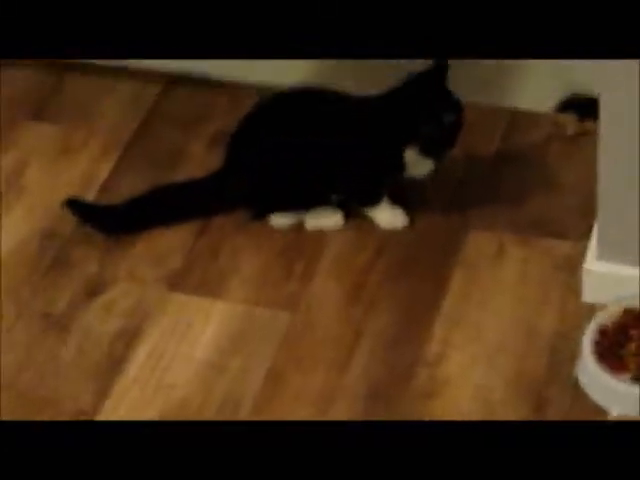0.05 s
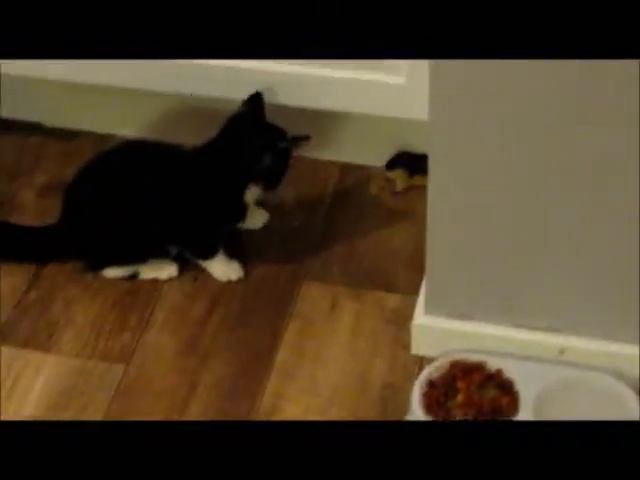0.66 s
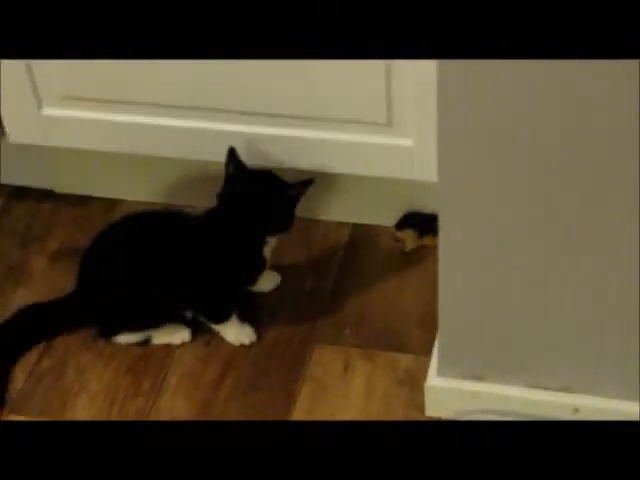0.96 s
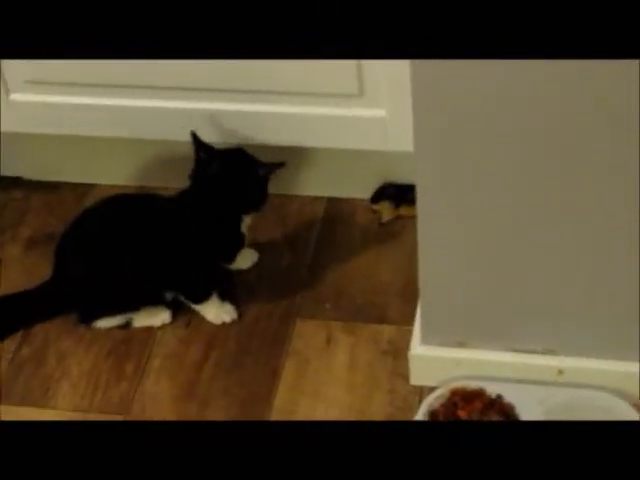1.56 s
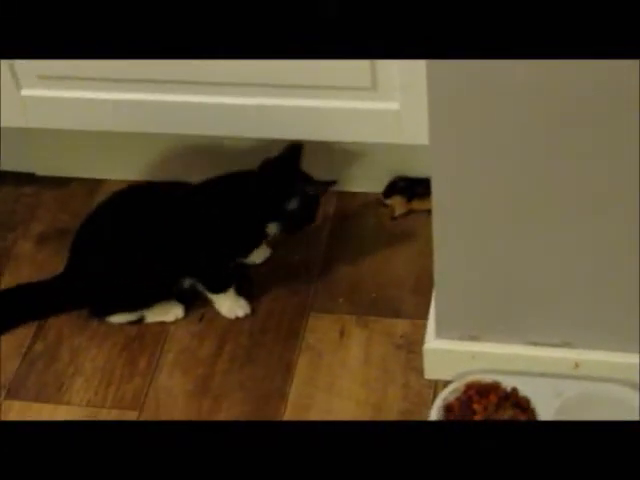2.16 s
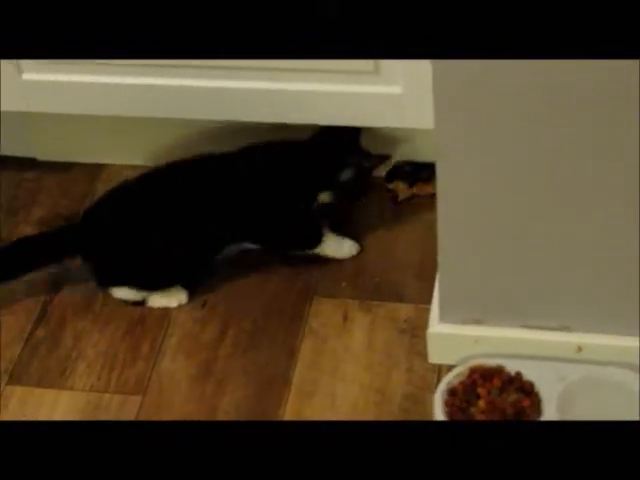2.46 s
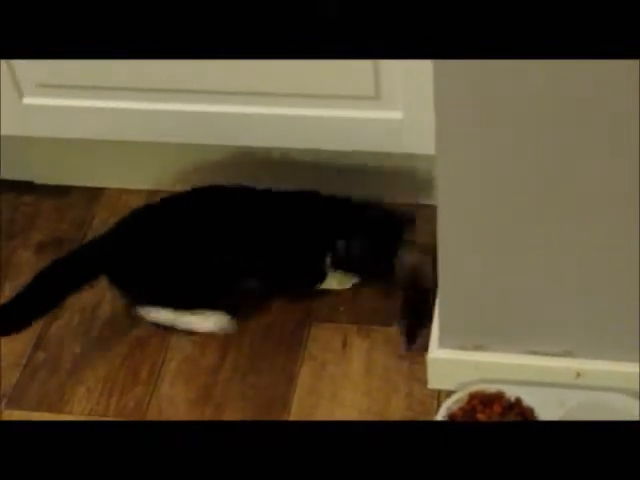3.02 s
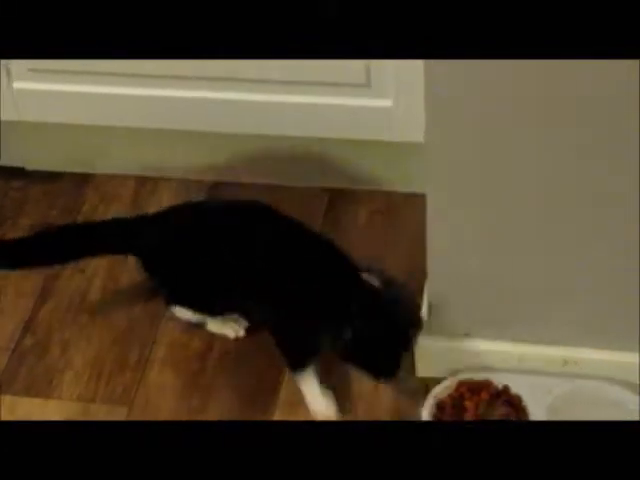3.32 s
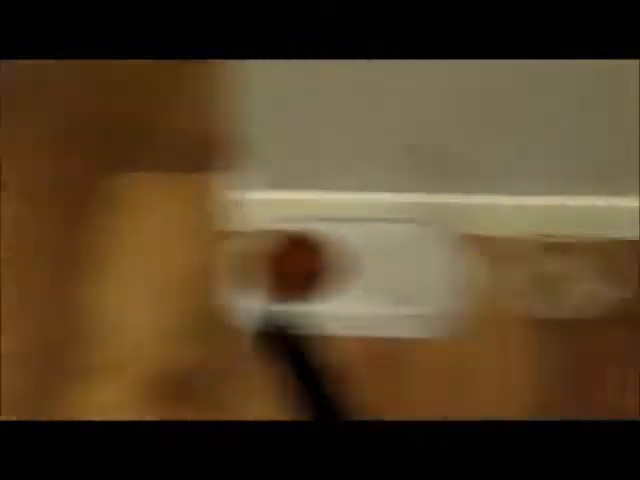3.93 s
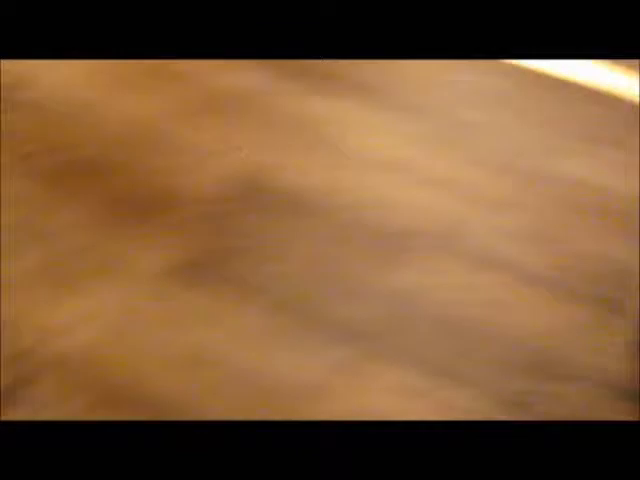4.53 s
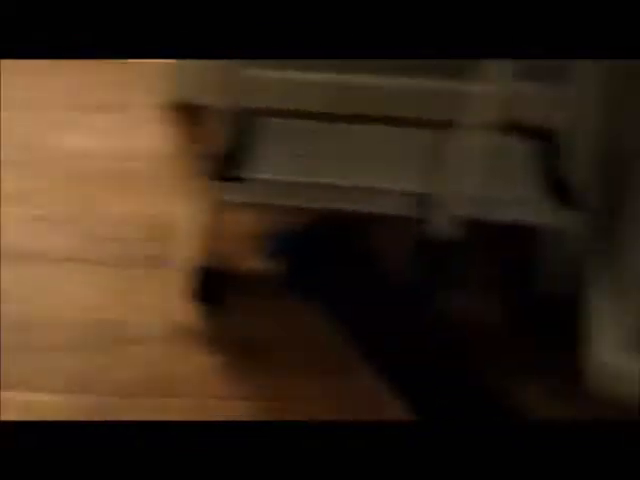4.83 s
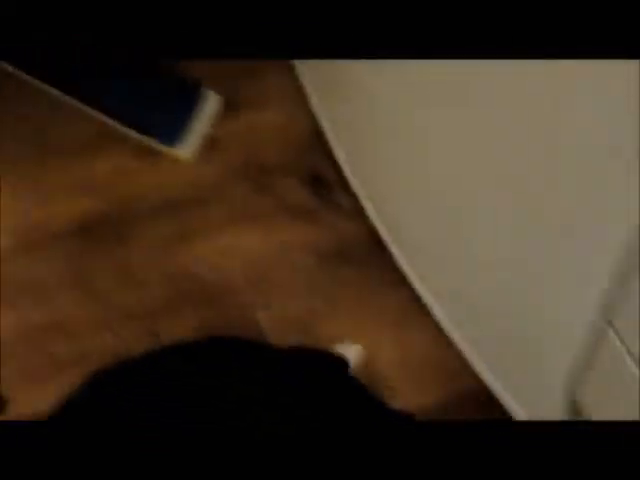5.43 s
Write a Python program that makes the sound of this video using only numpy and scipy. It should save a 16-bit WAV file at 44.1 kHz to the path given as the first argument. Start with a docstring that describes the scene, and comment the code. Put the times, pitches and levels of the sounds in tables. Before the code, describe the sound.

A mouse squeals in shrill bursts as a kitten pounces and chases it, paws thudding, skidding and scratching on a wooden kitchen floor.

```python
"""A kitchen hums quietly while a hand-held recorder ticks and rubs in the grip.
At 2.5 s a cornered mouse squeals in shrill, arched calls, and a kitten pounces on the wooden floor.
Paws thud, skid and scratch across the boards, and clothes rustle as the recorder follows the chase.
At 4.7 s the mouse squeals again. The animals ring in the room, and the recorder turns itself
down under both bouts of squeals."""
import sys
import numpy as np
from scipy import signal
from scipy.fft import rfft, irfft
from scipy.io import wavfile
from scipy.ndimage import uniform_filter1d

SR = 44100
rng = np.random.default_rng(int(sys.argv[2]) if len(sys.argv) > 2 else 0)


def inscribe(sig):
    """Save sig as 16-bit PCM at rate SR to the path in sys.argv[1].

    A 1-D sig is mono; a 2-D sig holds one channel per row.
    Samples are clipped to [-1, 1] before scaling.
    """
    pcm = np.round(np.clip(np.atleast_2d(sig).T, -1, 1) * 32767)
    wavfile.write(sys.argv[1], SR, pcm.astype(np.int16))


N = 246078
T = np.arange(N) / SR
CUTOFF_HZ = 15900

# flurries of paws: (time [s], patter level [dB], hold [s], fur and claw scratch level [dB])
FLURRIES = [(2.605, -37.5, 0.13, -29), (2.898, -43.5, 0.075, -29), (3.025, -44.5, 0.058, -50),
            (3.24, -56, 0.11, -46), (4.103, -51, .1, -39.5), (4.303, -41, 0.048, -42),
            (4.394, -38, 0.12, -52), (4.538, -33.5, 0.17, -45), (4.754, -34, .09, -42),
            (4.98, -51, 0.14, -39), (5.552, -38, .03, -63)]
FLURRY_SWELL_S, FLURRY_T60 = 0.0094, 0.35   # a t60 is the seconds a sound takes to fade by 60 dB


def mouse(jitter=0.058, shimmer_db=6, turbulence=0.41, waver=0.009, fade_s=0.00104):
    """A tiny throat makes a whistle-like voice; rasp shakes its pitch and level and adds breath."""
    # one arch of pitch a row; two long squeals break and carry on lower in the next row,
    # and the two rows near 1100 Hz are low opening creaks:
    # (time [s], length [s], rise [s], top pitch [Hz], sag [semitones], level [dB], swell [dB],
    #  first harmonic [dB], harmonics above the second [dB], rasp [0-1])
    squeals = [ (2.520, .008, 0.00081, 1150, .1, -17, 21, 4.5, 1.5, 0.47),
               (2.524, .064, .019, 5305, 3, -4, -8, -1, 2, 0.16),
               (2.626, .020, .002, 4100, .1, -8.5, -5, -5, -7, .23),
               (2.659, 0.018, .008, 4850, 1.5, -13.5, 16, 3.5, 0, 0.28),
               (2.689, 0.027, 0.0055, 4940, 0.5, -15, -12, 5, 1, .32),
               (2.766, 0.0073, 0.0011, 1122, .1, -16, -8.5, -8, -9, 0.56),
               (2.7706, 0.065, .019, 5650, 4, -5, 0.5, 1, 1, 0.09),
               (2.829, 0.031, 0.0017, 3835, 1.5, -12, -11, 3, -2, 0.05),
               (2.925, 0.015, 0.0056, 4430, .3, -18.5, -7, 13, -6, 0.3),
               (2.972, 0.023, .005, 4110, .5, -8, 2, 0.5, 1, .14),
               (2.996, 0.032, .001, 4070, 0.5, -20, -2, 6, -7, 0.4),
               (3.025, 0.05, 0.0027, 4096, 0.95, -18, -4, 13, 1.5, 0.47),
               (3.092, .050, .002, 3400, .1, -33, -3, 24, 0, .12),
               (4.697, .049, .002, 4160, -.8, -5, 6.5, 1.5, 2.5, 0.17),
               (4.764, 0.0076, 0.0052, 4273, 0.5, -2.5, 6, -11, -12, 0.56),
               (4.768, .021, 0.0051, 5120, 0, -6.5, -11, -8, 2, 0.04),
               (4.794, 0.042, .011, 4700, 3, -13, -3, 3, -9, 0.1),
               (4.856, 0.075, .014, 4850, 1.14, -3.5, -3, -3.5, -6, .1),
               (4.970, 0.017, .006, 3750, .1, -13.5, -4, -6, 1, .24),
               (4.999, 0.021, 0.0076, 4180, 0.7, -13, -4, -1, 0, 0.1),
               (5.029, 0.018, 0.003, 3960, 0.5, -18.5, 0, 14.5, 9.5, 0.15),
               (5.083, 0.033, 0.0078, 5050, 0.54, -5, -5, 3, 4, 0.03),
               (5.116, .075, 0.00067, 4540, 1, -11.5, 10, 1, -0.5, 0.13), ]
    # what the throat and mouth let through: (frequency [Hz], level [dB])
    throat = [(1100, -18.5), (2200, -26), (3400, -22), (4300, -19), (4900, -13.5), (5400, 0), (6200, -3),
              (7300, 1), (8500, 0.5), (9600, 0.5), (10800, -8.5), (12500, -17.5), (14500, -26),
              (16000, -45)]
    out = np.zeros(N)
    shake = wander(600)
    throb = np.clip(wander(510), -1.5, 1.5)
    breath = turbulence * noise(throat)
    unsteady = 1 + waver * wander(118)   # even the clearest call wavers
    for s, length, rise_s, top_hz, sag, db, swell_db, first_db, upper_db, own_rasp in squeals:
        on = (T >= s) & (T <= s + length)
        t = T[on] - s
        octaves_down, closing = pitch_arch(t, length, rise_s, sag)
        rasp = own_rasp + .1 * closing   # the voice frays and weakens as the arch ends
        effort_db = db + swell_db * (t / length - .5) - 5 * closing
        hz = top_hz * 2 ** -octaves_down * unsteady[on] * (1 + jitter * rasp * shake[on])
        phase = 2 * np.pi * np.cumsum(hz) / SR
        voice = np.zeros(len(t))
        for k in range(1, 14):
            gain = gain_at(throat, k * hz) * from_db(first_db * (k == 1) + upper_db * (k > 2))
            voice += gain * (k * hz < CUTOFF_HZ) * np.sin(k * phase + 2 * np.pi * rng.random())
        fade = np.clip(np.minimum(t, length - t) / fade_s, 0, 1)
        loudness = fade * from_db(effort_db + shimmer_db * rasp * throb[on])
        out[on] += (np.sqrt(2) * voice + rasp * breath[on]) * loudness
    return out


def pitch_arch(t, length, rise_s, sag, rise_oct_per_s=17, drop_oct_per_s=13):
    """Pitch slides up, sags, then drops. Gives octaves below its top, and the drop's progress (0-1)."""
    rise_s = np.clip(rise_s, 1e-4, .9 * length)
    drop_s = min(.025, .36 * length)
    opening = np.clip(1 - t / rise_s, 0, 1) ** 1.2
    sagging = np.clip((t - rise_s) / (length - rise_s), 0, 1) ** 0.85
    closing = np.clip(1 - (length - t) / drop_s, 0, 1) ** 2.3
    octaves = rise_oct_per_s * rise_s * opening + sag / 12 * sagging + drop_oct_per_s * drop_s * closing
    return octaves, closing


def patter():
    """Flurries of soft paws drum on the boards."""
    # tone of the drummed boards: (frequency [Hz], level [dB])
    tone = [(60, -35), (170, 8), (330, -9), (560, 6), (850, -9.5), (1200, -0.5), (2000, -3.5), (4000, -4.5),
            (12000, -60)]
    flurries = strokes([(s, db, hold) for s, db, hold, _ in FLURRIES], FLURRY_SWELL_S, FLURRY_T60)
    return flurries * grainy_noise(tone, grain_db=5.5, grain_hz=37)


def thuds(t60=0.057, contact_s=0.0012, spread=0.216):
    """A soft landing makes the boards ring at seven nearby pitches."""
    # paws and steps landing: (time [s], relative level [dB], middle pitch [Hz])
    landings = [(2.618, -31, 460), (2.661, -33, 171), (2.735, -31, 289), (2.915, -34.5, 608),
                (3.065, -36.5, 213), (3.154, -25.5, 176), (3.185, -38, 200), (3.64, -39.5, 163),
                (3.92, -39, 158), (3.994, -31.5, 138), (4.208, -33, 723), (4.32, -37.5, 207),
                (4.49, -32, 200), (4.546, -33, 987), (4.584, -31, 340), (4.635, -33, 250), (4.73, -28, 213),
                (4.808, -26.5, 1003), (4.913, -29.5, 220), (5.106, -34.5, 377.5)]
    out, t = np.zeros(N), T[:SR // 4]
    for s, db, hz in landings:
        pitches = hz * np.exp(spread * np.linspace(-1, 1, 7) + rng.normal(0, 0.032, size=7))
        cycles = pitches[:, None] * t + rng.random((7, 1))
        ring = unit_power(np.sin(2 * np.pi * cycles).sum(axis=0))
        add(out, s, ring * from_db(db + 3 - 60 * t / t60) * np.clip(t / contact_s, 0, 1))
    return out


def claws(t60=0.031, trot_span_s=(3.33, 3.95), step_s=0.049):
    """Hard claws click on wood: loud single hits, and a light, uneven trot as the kitten sets off."""
    # the loudest clicks: (time [s], relative level [dB])
    clicks = [(3.409, -24.5), (3.586, -24.5), (3.777, -26.5), (4.012, -25), (4.039, -25.5), (4.067, -21),
              (4.209, -10.5), (4.274, -23), (4.427, -20), (4.576, -16.5), (4.654, -11), (5.381, -18),
              (5.446, -15)]
    # tone of a click: (frequency [Hz], level [dB])
    tone = [(500, -10), (1400, -11), (2600, -5), (4500, -3), (7000, 2), (9400, 5), (12500, -8),
            (15500, -22)]
    out, t = np.zeros(N), T[:SR // 40]
    steps = zip(np.arange(*trot_span_s, step_s), rng.standard_normal(size=(16, 2)))
    trot = [(s + 0.004 * late, -34 + 4.5 * harder) for s, (late, harder) in steps]
    for s, db in clicks + trot:
        add(out, s, from_db(db - 8.5 - 60 * t / t60))
    return out * noise(tone)


def skids(sharpness=9):
    """Sliding feet scrape the boards; they stick and slip, which sings around one pitch."""
    # feet sliding: (time [s], level [dB], hold [s], singing pitch [Hz])
    slides = [(2.886, -30, 0.047, 3700), (3.024, -31, 0.093, 3390), (3.254, -32.5, 0.02, 2530),
              (3.641, -47, 0.0065, 2380), (4.055, -44, 0.053, 2860), (4.116, -25.5, 0.023, 2920),
              (4.453, -36, 0.021, 2300), (4.634, -23, 0.0052, 3000), (5.24, -29.5, 0.0019, 2960)]
    # tone of the scrape: (frequency [Hz], level [dB])
    tone = [(300, -10.5), (1200, -5), (2100, 5), (2700, 4.5), (3600, 1.5), (4900, 4), (6200, -4), (8300, 9),
            (9600, 2.5), (11500, -18), (15500, -43)]
    out = np.zeros(N)
    scrape = grainy_noise(tone, grain_db=0.5, grain_hz=200)
    slips = rng.standard_normal(N)
    for *stroke, hz in slides:
        singing = unit_power(signal.lfilter(*signal.iirpeak(hz, sharpness, fs=SR), slips))
        out += strokes([stroke], swell_s=0.0078, t60=0.14) * (scrape + singing)
    return out


def rustling(pounce_s=2.6, still_db=-62):
    """Clothes rustle and brush once the chase is on; fur and claws scratch in each flurry."""
    # clothes moving with the chase: (time [s], relative level [dB])
    movement = [(3.2, -54.5), (3.85, -60), (4.06, -61.5), (4.29, -44), (4.58, -49.5), (4.84, -44),
                (4.96, -37), (5.27, -52.5), (5.58, -45)]
    # quick brushes of cloth: (time [s], level [dB], hold [s])
    swipes = [(4.206, -23.5, .009), (4.255, -30, 0.0071), (4.308, -32, .035), (4.46, -28.5, 0.0056),
              (4.485, -26, 0.0052), (4.602, -21.5, 0.014), (4.686, -27, 0.014), (4.805, -20.5, 0.024),
              (4.97, -31.5, 0.094), (5.445, -32.5, 0.025), (5.48, -35, 0.06)]
    # tone of cloth and fur: (frequency [Hz], level [dB])
    tone = [(100, -10.5), (500, -2.5), (1400, -10), (2600, -2), (4500, 2), (7000, 0.5), (9400, 4),
            (10800, -3), (12500, -16), (15500, -27.5)]
    clothes = np.where(T < pounce_s, from_db(still_db), from_db(7.5) * gain_over_time(movement))
    brushes = strokes(swipes, swell_s=0.0026, t60=0.14)
    fur = strokes([(s, db, hold) for s, _, hold, db in FLURRIES], FLURRY_SWELL_S, FLURRY_T60)
    loudness = np.sqrt(clothes ** 2 + brushes ** 2 + fur ** 2)
    return loudness * grainy_noise(tone, grain_db=1.5, grain_hz=250)


def grip(ring_db=-8, ring_t60=0.014, crack_t60=0.012):
    """The recorder's light case ticks, each time with a ring of its own, and fingers slide over it."""
    # ticks in the hand: (time [s], peak [dB], brightness [dB per octave], own ring [Hz])
    ticks = [(.024, -24.5, 12, 8440), (.067, -29.5, -1, 5700), (.246, -32, -42, 1820),
             (.344, -18, -2, 2690), (0.819, -20.5, -11.5, 3900), (0.83, -28.5, -12, 2900),
             (1.112, -28, 2, 9100), (1.1203, -12, -4.5, 10030), (1.124, -18, -13, 5900),
             (1.343, -31.5, -17, 4040), (1.527, -29.5, -20, 3560), (1.729, -16.5, -6, 10170),
             (1.931, -25.5, 9, 4600), (2.122, -28.5, -14, 2240)]
    # pitches the case rings at: (frequency [Hz], level [dB], t60 [s])
    case = [(2150, -7.5, 0.006), (3870, -2, 0.017), (4480, 1, 0.0078), (5500, 7, 0.0029),
            (8960, 15, 0.0055), (9830, 18, 0.0022), (11900, -46, 0.0067), (14400, -15, .004)]
    # fingers sliding: (time [s], level [dB], hold [s])
    rubs = [(.458, -41.5, 0.064), (.68, -53.5, .015), (.759, -44, 0.054), (1.08, -52, 0.048)]
    # tone of a rub: (frequency [Hz], level [dB])
    rub_tone = [(900, -25), (1700, -6.5), (2300, -5), (2750, 0.5), (3600, -6), (5000, -10.5), (5650, -5.5),
                (6700, -22), (8200, -12), (9200, -9.5), (11000, -27), (15000, -42)]
    out, t = np.zeros(N), T[:SR // 40]
    shell = signal.butter(3, [900, 11000], "band", fs=SR, output="sos")
    for s, peak_db, brightness, ring_hz in ticks:
        body = np.zeros(len(t))
        for hz, db, t60 in case:
            fade = from_db(db + brightness * np.log2(hz / case[0][0]) - 60 * t / t60)
            body += fade * np.sin(2 * np.pi * hz * rng.normal(1, 0.018) * t) * rng.choice([-1, 1])
        ring = from_db(ring_db - 60 * t / ring_t60) * np.sin(2 * np.pi * ring_hz * t)
        crack = 0.35 * rng.standard_normal(len(t)) * from_db(-60 * t / crack_t60)
        tick = signal.sosfilt(shell, body / np.abs(body).max() + ring + crack)
        add(out, s, from_db(peak_db) * tick / np.abs(tick).max())
    rubbing = strokes(rubs, swell_s=0.0058, t60=0.3) * grainy_noise(rub_tone, grain_db=3, grain_hz=200)
    return out + rubbing


def moving_air():
    """Air rumbles against the moving microphone."""
    # strength of the air: (time [s], relative level [dB])
    gusts = [(0.0, -53), (0.06, -52.5), (2.42, -58.5), (2.55, -67), (4.09, -54.5), (4.13, -42), (4.18, -44),
             (4.23, -34), (4.33, -40.5), (5.22, -52), (5.28, -62), (5.36, -51.5), (5.58, -39)]
    # tone of the rumble: (frequency [Hz], level [dB])
    tone = [(20, -0.5), (40, 8), (65, -11.5), (110, -12.5), (300, -16), (2000, -56)]
    return from_db(-.5) * gain_over_time(gusts) * grainy_noise(tone, grain_db=-1, grain_hz=43)


def background(murmur_db=-52, hiss_db=-57.5):
    """Appliances murmur and hum, and the microphone adds a thin hiss."""
    # steady murmur of the house: (frequency [Hz], level [dB])
    murmur = [(12, -31), (20, -3.5), (139, -6.5), (169, -9.5), (439, -6.5), (649, -9.5), (771, -13),
              (1350, -17.5), (1730, -19.5), (2500, -18), (3120, -24), (3980, -24.5), (7000, -33),
              (9100, -85), (15400, -120)]
    # microphone hiss: (frequency [Hz], level [dB])
    hiss = [(5500, -13), (7300, -23.5), (7950, 0), (8200, -5), (8450, 0), (8750, 7.5), (9200, -20),
            (10500, -13), (12500, -18), (15500, -22)]
    # humming notes: (frequency [Hz], level [dB])
    notes = [(50, -61.5), (101, -63), (143, -62.5), (246, -65.5), (287, -70), (440, -65.5), (1975, -72.5)]
    hum = np.zeros(N)
    for hz, db in notes:
        phase = 2 * np.pi * (hz * T + rng.random()) + 0.19 * wander(1.8)
        hum += np.sqrt(2) * from_db(db) * np.sin(phase)
    return from_db(murmur_db) * noise(murmur) + from_db(hiss_db) * noise(hiss) + hum


def room(x, build_s=0.0036, tail_db=-3.5, echo_db=-13.5):
    """Direct sound, three echoes off floor and cupboards, then a tail that dies band by band."""
    # how long the kitchen rings: (frequency [Hz], t60 [s])
    ring_times = [(300, 0.39), (3000, 0.38), (5000, 0.29), (8500, 0.35), (11500, 0.24), (15000, 0.23)]
    t = T[:SR * 3 // 4]
    hz = np.fft.rfftfreq(len(t), 1 / SR)
    white = rfft(rng.standard_normal(len(t)))
    edges_hz = [0, 2000, 4000, 6000, 8000, 10000, 13000, SR // 2]
    tail = np.zeros(len(t))
    for low, high in zip(edges_hz, edges_hz[1:]):
        t60 = np.interp((low + high) / 2, *np.transpose(ring_times))
        tail += irfft(white * ((hz >= low) & (hz < high)), len(t)) * from_db(-60 * t / t60)
    tail *= np.clip(t / build_s, 0, 1)
    response = from_db(tail_db) * tail / np.sqrt(np.sum(tail ** 2))
    response[0] += 1   # the direct sound
    delays = (rng.uniform(.001, .012, size=3) * SR).astype(int)
    response[delays] += from_db(echo_db) * rng.choice([-1, 1], size=3)
    return signal.fftconvolve(x, response)[:N] / np.sqrt(np.sum(response ** 2))


def from_db(db):
    """Turn decibels into a gain, a number to multiply by."""
    return 10 ** (np.asarray(db) / 20)


def unit_power(x):
    """Scale a signal to an average power of 1."""
    return x / np.sqrt(np.mean(x ** 2) + 1e-20)


def gain_at(tone, hz):
    """Gain of a tone table at the given frequencies."""
    table_hz, db = np.transpose(tone)
    return from_db(np.interp(np.log(hz + 1), np.log(table_hz), db))


def gain_over_time(curve):
    """Join (time [s], level [dB]) points into a changing gain."""
    return from_db(np.interp(T, *np.transpose(curve)))


def with_tone(x, tone):
    """Filter a signal by a tone table; power 1."""
    return unit_power(irfft(rfft(x) * gain_at(tone, np.fft.rfftfreq(N, 1 / SR)), N))


def noise(tone):
    """Smooth noise with the given tone."""
    return with_tone(rng.standard_normal(N), tone)


def wander(hz):
    """Random motion up to about this rate; typical size 1."""
    return unit_power(signal.sosfilt(signal.butter(2, hz, fs=SR, output="sos"), rng.standard_normal(N)))


def grainy_noise(tone, grain_db, grain_hz):
    """Noise of many tiny slips or swirls of air, which come in clumps."""
    white = rng.standard_normal(N)
    clumps = from_db(grain_db * np.clip(wander(grain_hz), -2, 2))
    return with_tone(white * clumps, tone)


def strokes(rows, swell_s, t60):
    """Loudness of strokes (time [s], level [dB], hold [s]) that swell, hold and die away."""
    power = np.zeros(N)
    for s, db, hold in rows:
        swell = np.clip((T - s) / swell_s, 0, 1)
        fading_s = np.maximum(T - s - swell_s - hold, 0)
        power += (from_db(db - 60 * fading_s / t60) * swell) ** 2
    return np.sqrt(power)


def add(track, s, sound):
    """Mix a short sound in at s seconds."""
    start = max(int(s * SR), 0)
    track[start:start + len(sound)] += sound[:max(N - start, 0)]


def scene():
    """The animals sound through the room; grip, clothes and moving air are right at the microphone."""
    paws = patter() + thuds() + claws() + skids()
    air = moving_air()
    return (room(mouse() + paws) + rustling() + grip() + air + background())[None]


def record(dry, ceiling_db=-12.5, release_db_per_s=14):
    """The recorder turns loud sound down at once and recovers slowly, rounds peaks and cuts the top."""
    level_db = 10 * np.log10(np.abs(uniform_filter1d(dry[0] ** 2, size=200)) + 1e-12)
    excess_db = np.maximum(level_db - ceiling_db, 0)
    recovery_db = release_db_per_s * T
    cut_db = np.maximum.accumulate(excess_db + recovery_db) - recovery_db
    turned_down = dry * from_db(-uniform_filter1d(cut_db, size=100))
    treble_cut = signal.ellip(10, .2, 80, CUTOFF_HZ, fs=SR, output="sos")
    return signal.sosfilt(treble_cut, np.tanh(turned_down))


dry = scene()
out = record(dry)
inscribe(out)
```